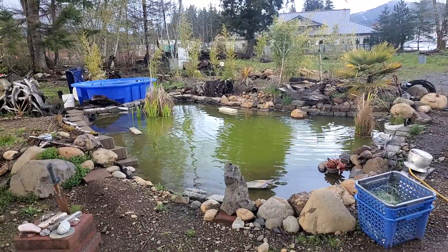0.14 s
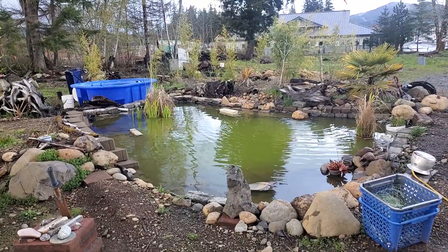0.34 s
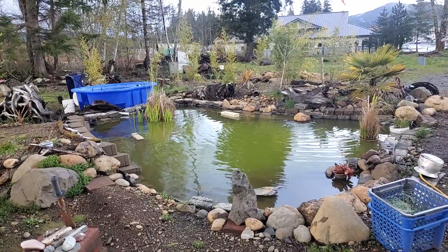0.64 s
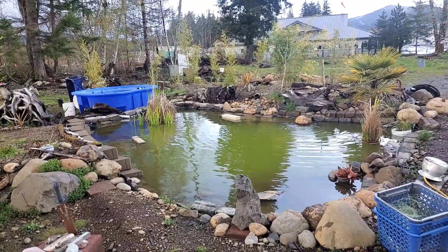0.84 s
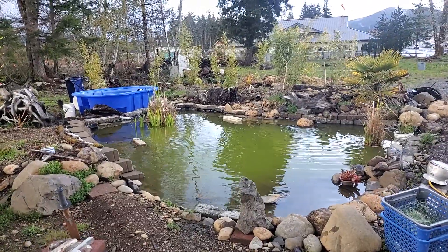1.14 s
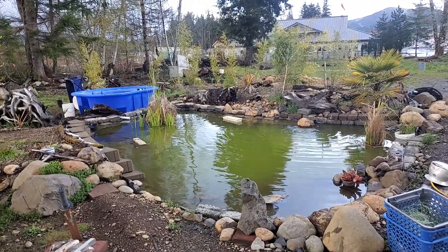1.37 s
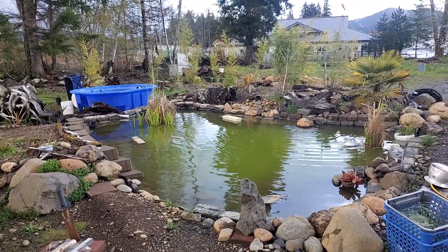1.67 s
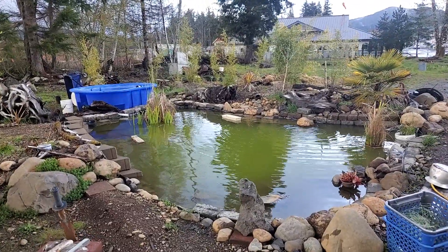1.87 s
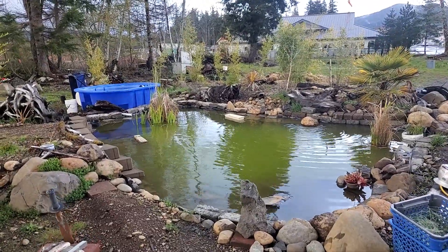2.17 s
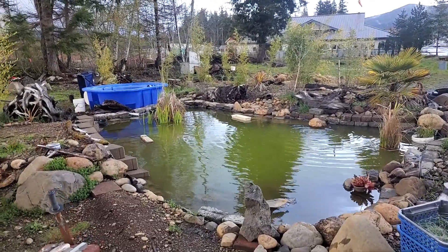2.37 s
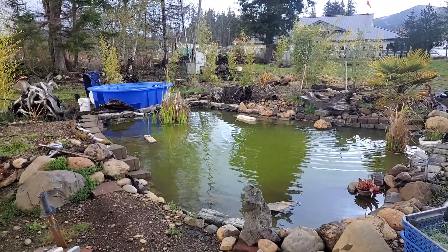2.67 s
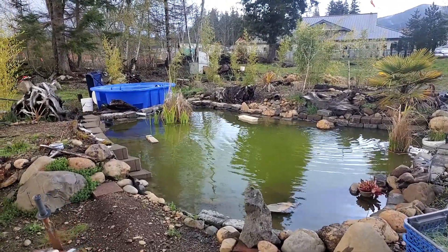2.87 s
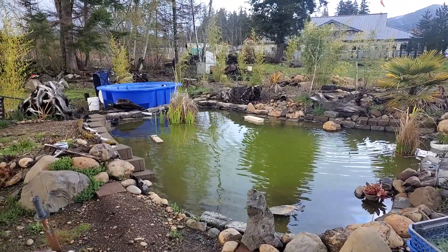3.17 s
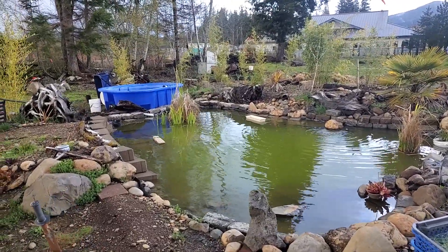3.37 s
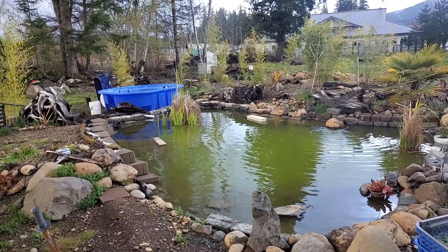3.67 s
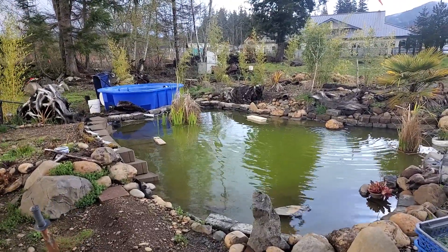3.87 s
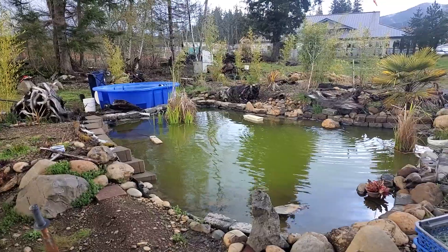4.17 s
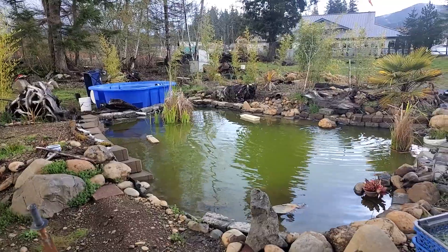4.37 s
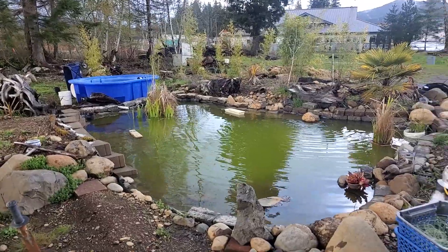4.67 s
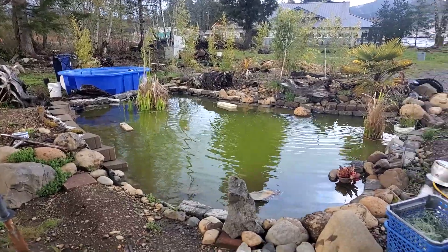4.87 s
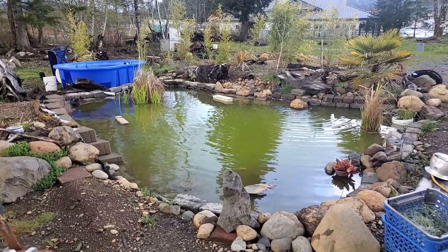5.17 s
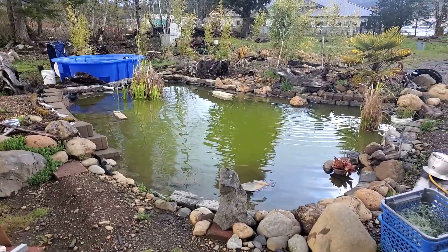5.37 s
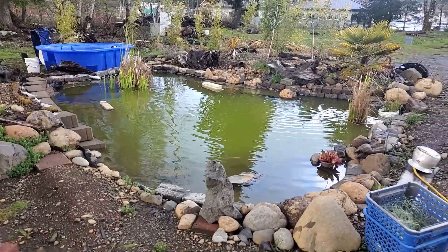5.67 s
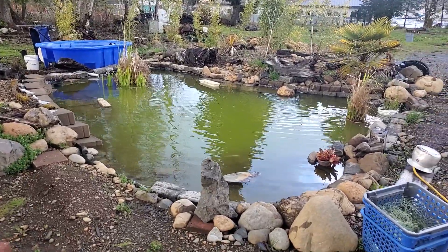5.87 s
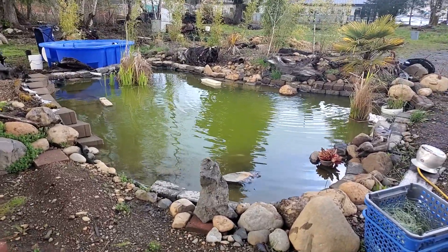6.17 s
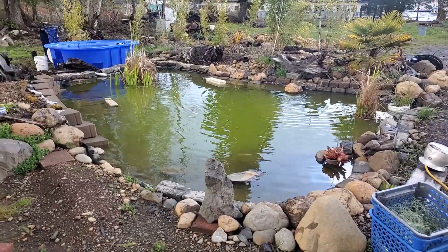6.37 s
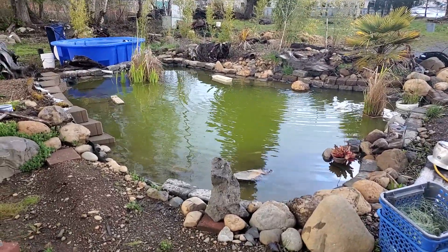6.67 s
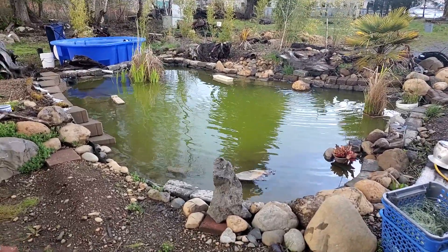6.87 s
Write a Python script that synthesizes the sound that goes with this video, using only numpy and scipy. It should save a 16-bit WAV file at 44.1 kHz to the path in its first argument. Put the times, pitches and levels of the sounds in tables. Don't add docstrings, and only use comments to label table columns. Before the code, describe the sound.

A nearby frog gives bright, buzzy two-note croaks at a garden pond, alternating with a duller distant frog over buffeting wind and faint hum.

```python
import sys
import numpy as np
from scipy import signal
from scipy.fft import rfft, irfft, next_fast_len
from scipy.io import wavfile
from scipy.ndimage import uniform_filter1d

SR = 44100
rng = np.random.default_rng(int(sys.argv[2]) if len(sys.argv) > 2 else 0)


def master_out(mix):
    frames = np.transpose(np.atleast_2d(mix))
    ceiling = np.clip(frames, -1, 1)
    pcm = np.round(ceiling * 32767).astype(np.int16)
    wavfile.write(sys.argv[1], SR, pcm)


def convert_level_to_amplitude(level_db):
    exponent = np.asarray(level_db, float) / 20
    return 10 ** exponent


N = 309582


def columns_at(table, x):
    table = np.array(table)
    return [np.interp(x, table[:, 0], column) for column in table.T[1:]]


def curve(table):
    return columns_at(table, np.arange(N) / SR)[0]


def spectrum_db(shape, hz):
    points = np.array(shape)
    return np.interp(np.log(hz), np.log(points[:, 0]), points[:, 1])


def noise(shape, size=N):
    n = next_fast_len(size, real=True)
    hz = np.maximum(np.arange(n // 2 + 1) * SR / n, 1)
    white = rfft(rng.standard_normal(n))
    x = irfft(white * convert_level_to_amplitude(spectrum_db(shape, hz)), n)[:size]
    return x / x.std()


def walk(rate):
    hold = int(SR / rate)
    steps = np.repeat(rng.standard_normal(N // hold + 1), hold)
    return 1.3 * uniform_filter1d(uniform_filter1d(steps, hold), hold)[:N]


def add_ring(out, s, hz, db, rise_ms, ring_ms, drop=0., pan_db=0., lead=0., phase=0.):
    t = np.arange(int(min(.04, .009 * ring_ms + .003) * SR)) / SR
    shape = (1 - np.exp(-t * 1000 / rise_ms)) ** 2 * np.exp(-t * 1000 / ring_ms)
    sag = 1 + drop * (np.exp(-t / 0.002) - .4)
    turn = 2 * np.pi * hz * np.cumsum(sag) / SR + phase
    pair = np.sin(turn + np.array([[lead], [-lead]]) / 2) * convert_level_to_amplitude(np.array([[pan_db], [-pan_db]]) / 2)
    pair *= shape * convert_level_to_amplitude(db) / np.sqrt(np.sum(shape ** 2) / 2 / SR)
    start = int(s * SR)
    out[:, start:start + len(t)] += pair[:, :N - start]


# (frequency [Hz], width [Hz], loudest at [s], level [dB], fading [dB/s])
HUM = [
    (153.1, 31, -0.5, -54.5, 2.44),
    (224.2, 21, 1, -65, 2.5),
    (123.5, 11, 4.5, -62.5, 3),
    (255.5, 12, 4, -73.5, 1),
]


def motor_hum():
    rise_db_per_s = 11.5
    t, out = np.arange(N) / SR, np.zeros((2, N))
    right_bass = convert_level_to_amplitude(np.clip(gust_level_db() - curve(BREEZE), -45, -3))
    ports = np.array([np.full(N, 2.16), right_bass])
    for hz, width, loudest_s, db, fading in HUM:
        line = noise([(hz - 2 * width, -50), (hz - width / 2, -3), (hz, 0),
                      (hz + width / 2, -3), (hz + 2 * width, -50)])
        fall_db = np.maximum(fading * (t - loudest_s), rise_db_per_s * (loudest_s - t))
        out += line * convert_level_to_amplitude(db - fall_db) * ports
    return out


def low_rush():
    rush_db, db_per_breeze_db, smooth_s = -63, 0.83, 0.14
    colour = [(200, -46), (270, 0.5), (350, 1), (550, -8.0), (900, -17.5), (2000, -49), (6000, -82.5)]
    mid, side = noise(colour), noise(colour)
    breeze_db = uniform_filter1d(curve(BREEZE) + 40, int(smooth_s * SR))
    level = convert_level_to_amplitude(rush_db + db_per_breeze_db * breeze_db + 3.6 * walk(7))
    pair = np.array([convert_level_to_amplitude(-2.5) * (mid + 0.86 * side), convert_level_to_amplitude(4.0) * (mid - 0.78 * side)])
    return 0.76 * level * pair


# (frequency [Hz], level [dB per Hz])
GARDEN = [(400, -20), (600, 0), (900, -3), (1400, -8), (2100, -9), (2700, -17), (3500, -16), (5000, -15),
          (6900, -20), (7700, -32), (10000, -33), (13000, -28.5), (15500, -34)]
# (time [s], level [dB])
LEAVES_DB = [(0, 4.5), (1.1, 9), (1.45, 0.5), (2, -1.5), (2.5, 7), (3.9, 11), (5.2, 17), (6.3, 7.5),
             (6.5, 1)]


def garden_hiss():
    low_db, db_per_breeze_db = -65.5, 0.23
    low_level_db = low_db + db_per_breeze_db * (curve(BREEZE) + 40)
    leaf_level_db = curve(LEAVES_DB) - 76
    swell, hiss = walk(1.5), np.zeros((2, N))
    for hz in 500 * 2 ** np.arange(0, 5.1, .5):
        band = [(hz / 1.5, -40), (hz / 1.19, -3), (hz, 0), (hz * 1.19, -3), (hz * 1.5, -40)]
        band_db = spectrum_db(GARDEN, hz) + 10 * np.log10(hz / 3000)
        level_db = low_level_db if hz < 3000 else leaf_level_db
        both = noise(band)
        pair = np.array([convert_level_to_amplitude(2) * (.5 * both + noise(band)), convert_level_to_amplitude(-2) * (.5 * both + noise(band))])
        flicker_db = .7 * swell + 3.2 * walk(2.5) + 1.5 * walk(9)
        hiss += convert_level_to_amplitude(band_db + level_db + flicker_db) * pair
    return hiss


# (start [s], end [s], level [dB])
GUSTS = [(0.073, 0.088, -44), (0.209, 0.249, -42), (0.547, 0.731, -46.5), (0.869, 1.006, -32),
         (1.057, 1.203, -36), (1.248, 1.327, -47.5), (1.51, 1.581, -29.5), (1.636, 1.679, -35),
         (1.94, 1.964, -49), (2.12, 2.164, -36), (2.187, 2.27, -31), (2.802, 2.819, -54.5),
         (3.107, 3.114, -48), (3.152, 3.2, -36.5), (3.675, 3.69, -33), (3.902, 3.959, -49.5),
         (4.52, 4.55, -51.5), (5.154, 5.194, -48), (5.231, 5.628, -57.5), (5.651, 5.667, -53),
         (5.762, 6.127, -59), (6.187, 6.385, -48.5), (6.556, 6.737, -62), (6.771, 6.826, -49.5),
         (6.847, 6.883, -50)]


def gust_level_db():
    shelter_db, edge_db_per_s = -81., 1201
    t, db = np.arange(N) / SR, np.full(N, shelter_db)
    for start, end, gust_db in GUSTS:
        outside_s = np.maximum(np.maximum(start - t, t - end), 0)
        db = np.maximum(db, gust_db - edge_db_per_s * outside_s)
    return db


# (frequency [Hz], level [dB per Hz])
WIND = [(15, 0.5), (30, -3), (55, 10.5), (100, 5), (160, -6.5), (250, -16.5), (400, -75), (2000, -100)]
# (time [s], level [dB])
BREEZE = [(0, -40), (.6, -43.5), (1.0, -42), (1.28, -33.5), (1.44, -46.5), (1.6, -33), (2.2, -37),
          (2.37, -38.5), (2.76, -32), (2.97, -37.5), (3.16, -35.5), (3.8, -47), (3.98, -31.5), (4.19, -42),
          (4.58, -36), (4.71, -49), (6.1, -53.5), (7.02, -56.5)]


def wind():
    shared = noise(WIND) * convert_level_to_amplitude(3.5 * walk(14))
    own = noise([(hz * 1.25, db) for hz, db in WIND]) * convert_level_to_amplitude(4 * walk(18))
    gust = convert_level_to_amplitude(gust_level_db())
    left = shared * np.hypot(convert_level_to_amplitude(curve(BREEZE) - 2.0), gust * convert_level_to_amplitude(0.5))
    right = (.7 * shared + .7 * own) * gust * convert_level_to_amplitude(-1.0)
    return np.array([left, right])


# (time [s], peak level [dB], frequency [Hz])
PIPS = [
    (1.644, -61.5, 730),
    (4.326, -51, 1076),
    (4.724, -45.5, 1013),
    (5.538, -52.5, 770),
    (6.527, -57, 982),
]


def third_frog():
    out = np.zeros((2, N))
    for s, db, hz in PIPS:
        add_ring(out, s, hz, db - 24.5, 1.5, 7, .05, 1.5, .2)
    return out


# (time [s], peak level [dB], frequency [Hz])
TICKS = [(0.0613, -55.5, 4150), (0.5603, -61.5, 6840), (0.634, -56, 11400), (0.7913, -63, 5340),
         (0.828, -62, 6643), (2.463, -61.5, 4320), (2.748, -48.5, 4240), (2.955, -65, 4944),
         (3.5907, -74, 5060), (3.683, -58.5, 4050), (5.024, -57, 4400), (5.423, -61.5, 6900),
         (5.454, -56.5, 7850), (5.4774, -63, 5700), (5.5093, -59, 4880), (5.9665, -63, 6560)]


def ticks():
    out = np.zeros((2, N))
    rustle = rng.random((110, 3)) * [6.4, 12, 6000] + [0, -76, 3500]
    for s, db, hz in [*TICKS, *rustle]:
        add_ring(out, s, hz, db - 31.5, .05, .3, .3, 7, 1.5)
        add_ring(out, s + 0.00089, 0.69 * hz % 14000, db - 28, .05, .25, .3, 6, 2.2)
    return out


# (delay [ms], level [dB])
ECHOES = [
    (3.1, -38),
    (7.5, -12),
    (14, -16.5),
    (24, -29),
]


def pond(dry):
    t60_s, tail_db, tail_hz, width_hz = 0.87, -31.5, 2150, 81
    colour = [(300, -8), (1000, -3), (tail_hz - width_hz, -2), (tail_hz, -4),
              (tail_hz + width_hz, -2), (3000, -10), (9000, -14)]
    t = np.arange(SR) / SR
    patchy = convert_level_to_amplitude(3 * walk(30)[:SR])
    fade = 1000 ** (-t / t60_s) * np.minimum(t / 0.048, 1) * patchy
    gain = convert_level_to_amplitude(tail_db) / np.sqrt(np.sum(fade ** 2))
    response = np.array([noise(colour, size=SR) * fade * gain for _ in range(2)])
    response[:, 0] = 1
    for ms, db in ECHOES:
        response[:, int(ms * SR / 1000)] += convert_level_to_amplitude(db)
    return signal.fftconvolve(dry, response, axes=1)[:, :N]


# (frequency [Hz], level [dB per Hz])
SPRAY = [(2500, -22), (3600, 1), (4400, -4.5), (5500, -11.5), (7500, -8), (9500, -20.5), (12000, -17.5),
         (14000, -31), (16000, -28.5)]


def frog(notes, swells, bearing, voice, pitch, wheeze, first_lead, body_hz, body_db, second_db, whistle_hz,
         whistle_db, snap_db, sustain, linger, spray_db, stretches=False):
    tires_after_s, growth_ms_per_s = .12, 1.5
    second_note_s = .068
    slack_db, slack_s = 3, 0.02
    wheeze_sag_s = .6
    out, gate = np.zeros((2, N)), np.zeros((2, N))
    for n, (first, last, rate, peak_db, ring_db) in enumerate(notes):
        second = n % 2
        length = last - first
        sac_hz, *leads = columns_at(bearing, (first + last) / 2)
        end_hz, dip, climb = pitch[second]
        begin = last - second_note_s if second and not stretches else first
        growth_s = growth_ms_per_s * max(length - tires_after_s, 0) / 1000
        k = np.arange(24)
        times = first + k / rate + growth_s * k * k / 2
        chance = rng.standard_normal((len(k), 9))
        for s, luck in zip(times[times < last], chance):
            place = (s + .003 - begin) / (length if stretches else 1)
            db, sac_db, third_db, ratio = columns_at(swells[second], place)
            sac_db += ring_db
            db += peak_db - 10 * np.log10(rate)
            if s == first and not second:
                db -= 7
            f0 = end_hz * (1 - dip * np.exp(-(s - first) / climb)) * (1 + 0.029 * luck[0])
            s += .0002 * luck[1]
            hold = 1 + second * linger + sustain * second * (abs(s - first) / length) ** 1.1

            sac = sac_hz * ratio * (1 + 0.0071 * luck[2])
            third = 1.4595 * (0.53 * f0 + 1.457 * end_hz) * (1 + 0.023 * luck[7])
            partials = zip((f0, sac, third), (0, sac_db, third_db), (first_lead, *leads), voice, luck[3:])
            for hz, over_db, lead, (rise, ring, drop, pan_db), size in partials:
                add_ring(out, s, hz, db + over_db + .6 * size, rise, ring * hold, drop, pan_db, lead,
                         .4 * size)

            high_db = db + third_db
            add_ring(out, s, body_hz, db + body_db, 1.5, 3.5, .02, 1.2, first_lead)
            add_ring(out, s, 2 * f0, db + second_db, .8, 2.5, .06, 2.5, leads[0], 3 * luck[8])
            add_ring(out, s, 4 * f0, high_db - 19.5, .9, 3.3 * hold, .03, 3.5, 2.5, 3 * luck[8])
            sink = 1 - ((s - notes[n - second][0]) / wheeze_sag_s) ** 2
            for wheeze_hz, wheeze_db in wheeze:
                add_ring(out, s, wheeze_hz * sink * (1 + .012 * luck[0]), high_db + wheeze_db + 5 * second,
                         1.5, 3 * hold, .01, 3.5, 1.9, 3 * luck[6])
            add_ring(out, s, whistle_hz * (1 + 0.038 * luck[8]), db + whistle_db, .8, 2.2, .03, 3.5, 1.9,
                     3 * luck[7])

            db += slack_db * np.exp(-(s - first) / slack_s) * (1 - second)
            add_ring(out, s, 1.558 * f0, db + snap_db, .25, 1.1, 0., 1.5, first_lead, 3 * luck[6])
            add_ring(out, s, 2.42 * f0, db + snap_db + 7.0, .25, 1.1, 0., 1.5, leads[1], 3 * luck[7])
            add_ring(gate, s, 0, db + spray_db, 1.3, 5 * hold, phase=np.pi / 2)
        shut = int((last + 0.016) * SR)
        out[:, shut:shut + 800] *= np.exp(-np.arange(800) / SR / .004)
    out = signal.sosfilt(signal.butter(4, 660, "high", fs=SR, output="sos"), out)
    both = noise(SPRAY)
    left = convert_level_to_amplitude(3.5) * (0.27 * both + noise(SPRAY))
    right = convert_level_to_amplitude(-5.5) * (-.7 * both + noise(SPRAY))
    return out + gate * np.array([left, right])


# (first pulse [s], last pulse [s], pulse rate [1/s], peak [dB], sac ring over it [dB])
FAR_NOTES = [(1.5084, 1.603, 86.3, -43, 1), (1.6858, 1.734, 91.7, -40, -4),
             (2.5395, 2.624, 86.8, -42.5, -1), (2.7048, 2.746, 81.2, -38, -2.5),
             (4.3528, 4.441, 84.2, -42.5, -5), (4.5104, 4.605, 76.5, -38.5, -8),
             (5.5613, 5.626, 81.3, -45, -4), (5.7063, 5.762, 77.9, -40.5, -8.5),
             (6.6947, 6.754, 91.5, -45, -1), (6.8395, 6.882, 76.3, -40.5, -3.5)]
# (share of note [1], level [dB], sac ring [dB], third partial [dB], sac pitch ratio [1])
FAR_SWELL = [
    [(0, -12, -7, -33.5, .93), (.85, -1, -0.5, -30.5, 0.98), (1.08, -7, -1.5, -23, 0.99)],
    [(0, -3.5, 0.5, -43, 1.04), (.5, 1, -1.5, -29, 1.04), (1.15, -14, -7, -27.5, 1.03)],
]
# (time [s], sac pitch [Hz], left lead of 2nd partial [rad], of 3rd partial [rad])
FAR_BEARING = [(1.6, 2000, 0.84, 1.89), (2.65, 2033, 0.75, 1.7), (4.4, 1945, -0.84, 0),
               (4.55, 1985, 1.82, 1.6), (5.6, 1860, 0.31, 1.7), (5.73, 1983, 2, 1.85),
               (6.72, 1882, 0.76, 0.8), (6.858, 1970, 1.8, 0.89)]
# (rise [ms], ring [ms], pitch drop share [1], left minus right [dB])
FAR_VOICE = [
    (2, 1.67, 0.097, 4.6),
    (1.8, 3.5, 0.025, 2.8),
    (0.47, 1.4, 0.051, 1.2),
]
# (end pitch [Hz], starting dip share [1], climb [s])
FAR_PITCH = [
    (880, 0.085, 0.1),
    (994.5, 0.074, 0.0064),
]


def far_frog():
    return frog(FAR_NOTES, FAR_SWELL, FAR_BEARING, FAR_VOICE, FAR_PITCH, wheeze=[], first_lead=0.15,
                body_hz=806, body_db=-8, second_db=-8.5, whistle_hz=4850, whistle_db=-29.5,
                snap_db=-23, sustain=.6, linger=0.94, spray_db=-35.5, stretches=True)


# (first pulse [s], last pulse [s], pulse rate [1/s], peak [dB], sac ring over it [dB])
NEAR_NOTES = [(0.244, 0.43, 94.75, -45.5, 18.5), (0.4368, 0.504, 110, -42.5, 16.5),
              (1.0472, 1.232, 95.0, -44.5, 14.5), (1.2381, 1.306, 94.25, -42, 15.5),
              (2.0227, 2.161, 90.3, -45, 19), (2.1949, 2.273, 95.0, -40.5, 14),
              (3.078, 3.22, 90.1, -45, 17), (3.261, 3.328, 95.7, -42.5, 15),
              (3.8583, 4.033, 93, -44.5, 11.5), (4.0398, 4.108, 93.5, -41.5, 10),
              (4.938, 5.077, 90.1, -45, 13), (5.1196, 5.188, 93.2, -43.5, 15),
              (6.1048, 6.253, 92.3, -44.5, 13.5), (6.2875, 6.353, 97.75, -42.5, 12.5)]
# (time into note [s], level [dB], sac ring [dB], third partial [dB], sac pitch ratio [1])
NEAR_SWELL = [
    [(0, -15, -12.5, -6, 0.88), (.045, -6, -7, -0.5, .96), (.09, 0.5, 1, -2.5, .975),
     (.135, 1, -2.5, -3, 1), (.19, 2, -13.5, 1, .99)],
    [(0, -5, -3.5, 0.5, 1.03), (.04, 1.5, 3.5, -3, 1.003), (.052, -0.5, -2.5, 1.5, 1.0),
     (.075, -3, -10, 3.5, 0.9)],
]
# (time [s], sac pitch [Hz], left lead of 2nd [rad], 3rd partial [rad])
NEAR_BEARING = [(.4, 2150, 1.37, 1.15), (1.2, 2159, 1.35, 1.16), (2.15, 2135, 1.28, 0.77),
                (3.198, 2150, 1.1, 0.37), (3.999, 2170, 1.59, 0.91), (5.079, 2175, 4.33, 1.68),
                (6.25, 2147, 3.84, 1.75)]
# (rise [ms], ring [ms], pitch drop share [1], left minus right [dB])
NEAR_VOICE = [
    (1.3, 1.87, 0.16, 1),
    (3.2, 2.12, 0.015, 3.5),
    (2, 1.5, 0.059, 1.5),
]
# (end pitch [Hz], starting dip share [1], climb [s])
NEAR_PITCH = [
    (1043.7, 0.32, 0.046),
    (1079.5, 0.13, 0.02),
]
# (frequency [Hz], level [dB])
WHEEZE = [(8900, -33), (13700, -36.5), (14900, -40.5)]


def near_frog():
    return frog(NEAR_NOTES, NEAR_SWELL, NEAR_BEARING, NEAR_VOICE, NEAR_PITCH, wheeze=WHEEZE, first_lead=0.82,
                body_hz=862, body_db=-6.5, second_db=1.5, whistle_hz=3280, whistle_db=-21.5,
                snap_db=-10, sustain=1.9, linger=.1, spray_db=-25)


def scene():
    background = motor_hum() + low_rush() + garden_hiss()
    animals = third_frog() + ticks() + far_frog() + near_frog()
    return background + wind() + pond(animals)


def roll_off(x):
    return signal.sosfilt(signal.butter(12, 15710, fs=SR, output="sos"), x)


def record(dry):
    return roll_off(dry)


dry = scene()
out = record(dry)
master_out(out)
```